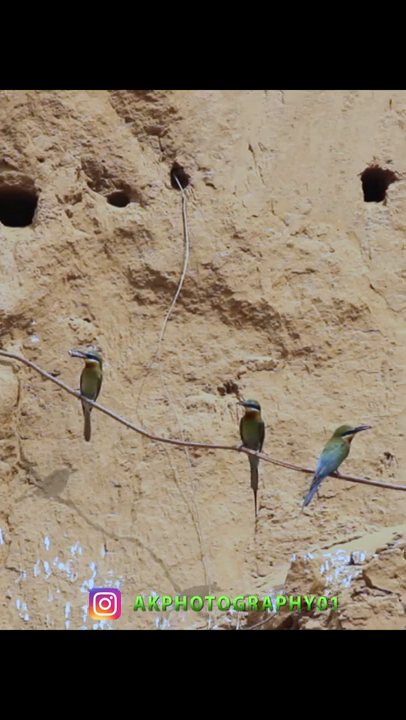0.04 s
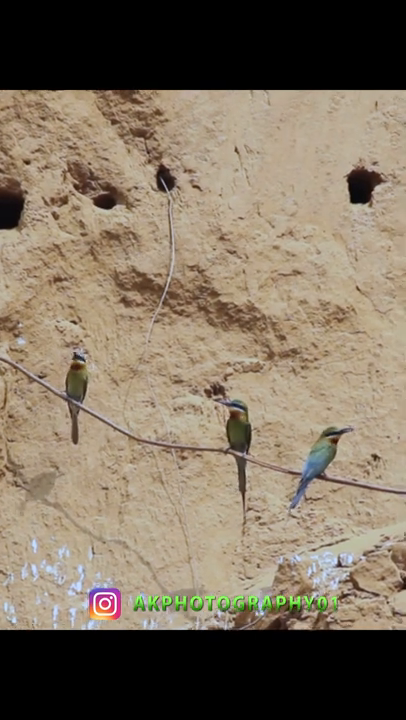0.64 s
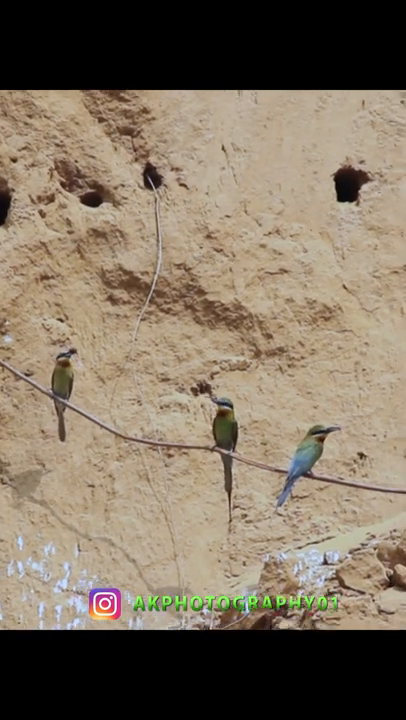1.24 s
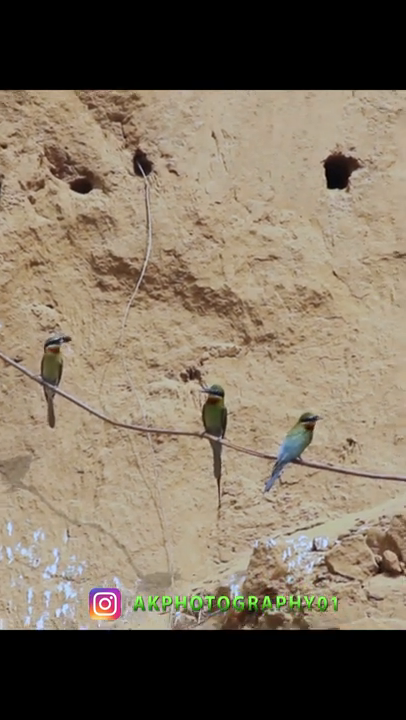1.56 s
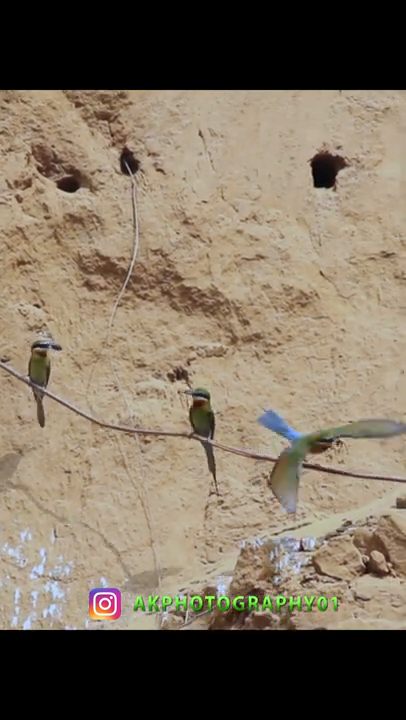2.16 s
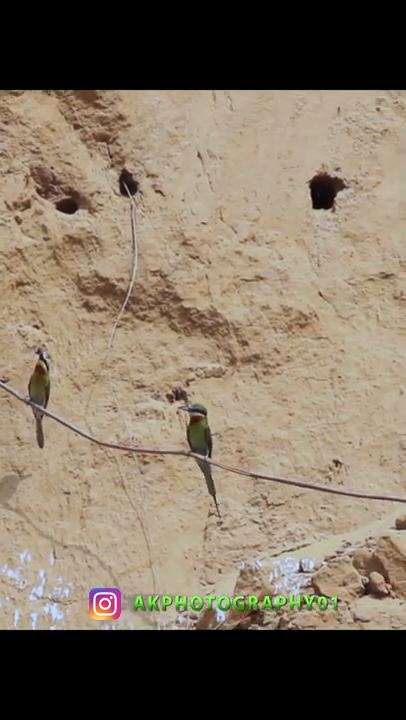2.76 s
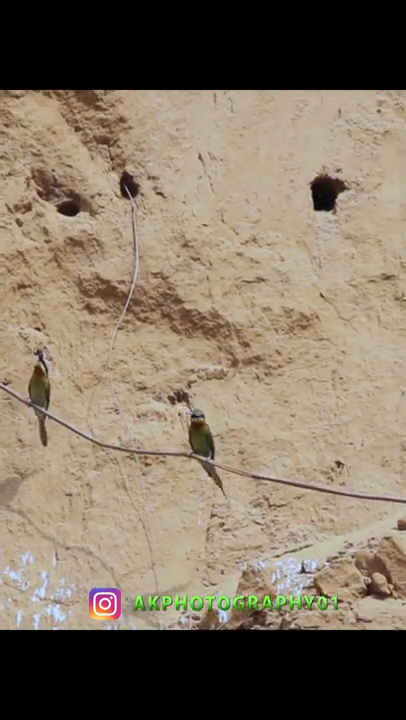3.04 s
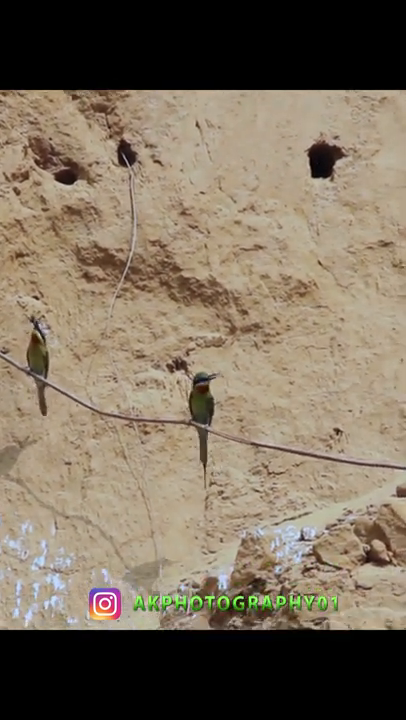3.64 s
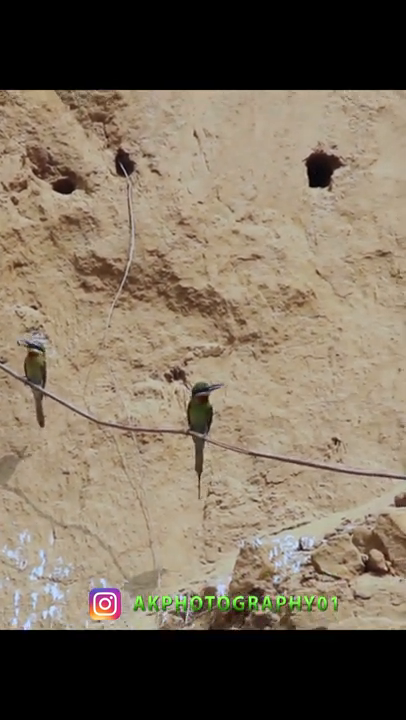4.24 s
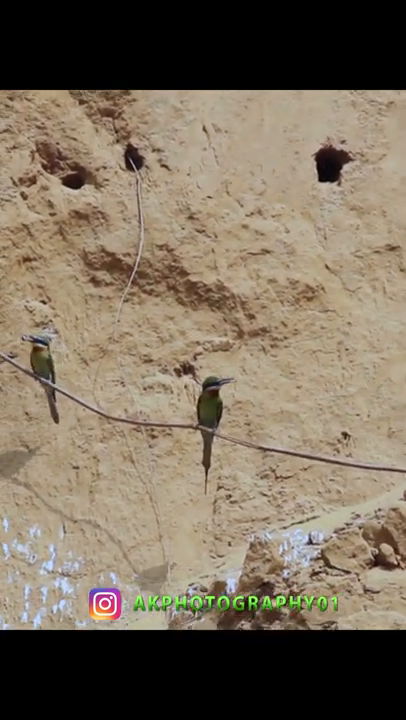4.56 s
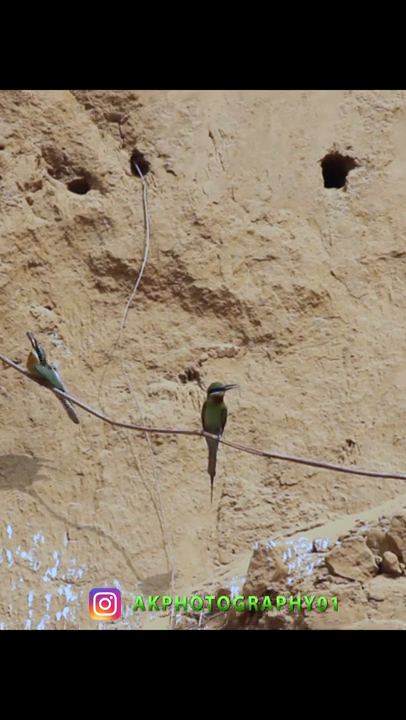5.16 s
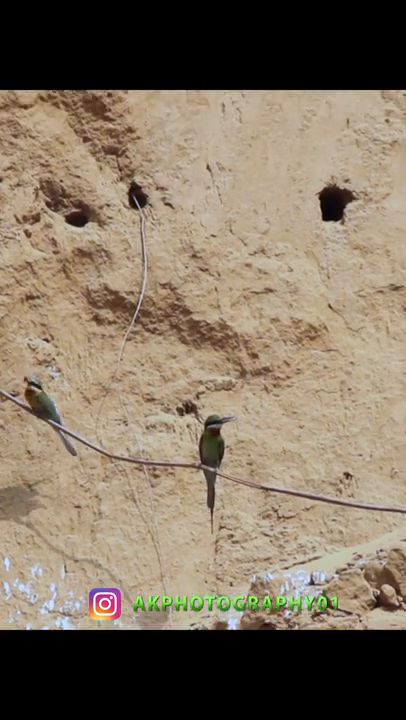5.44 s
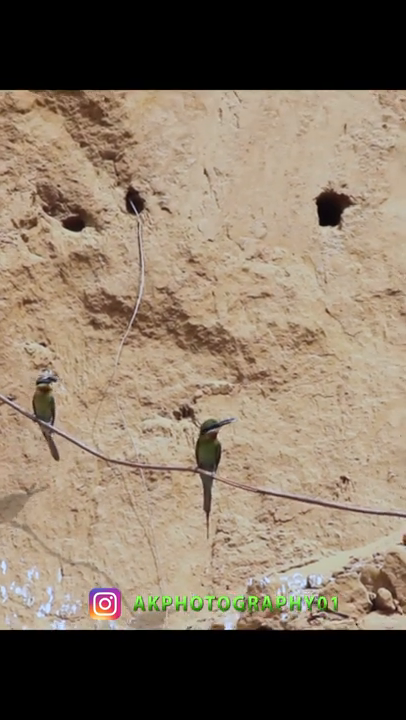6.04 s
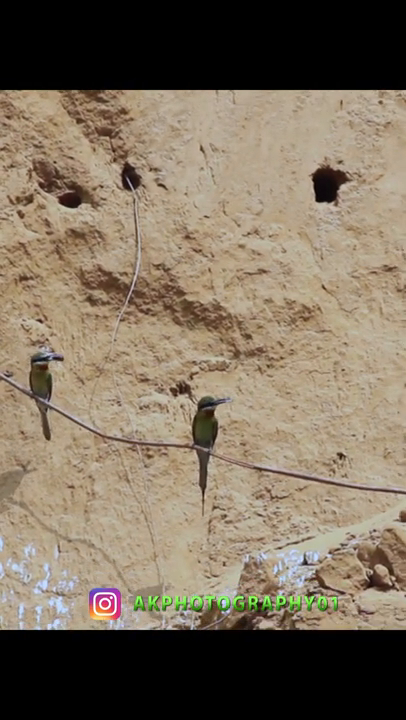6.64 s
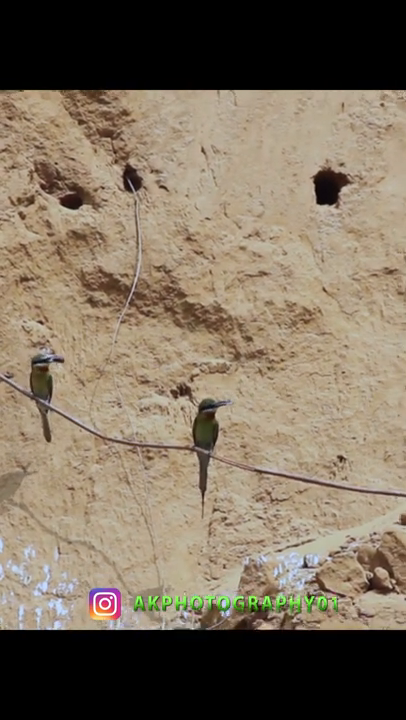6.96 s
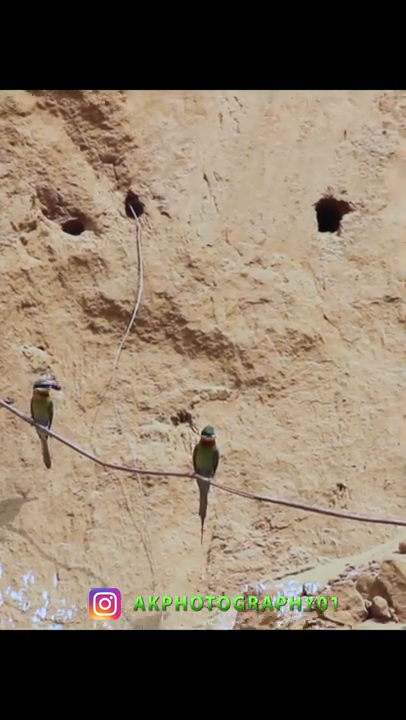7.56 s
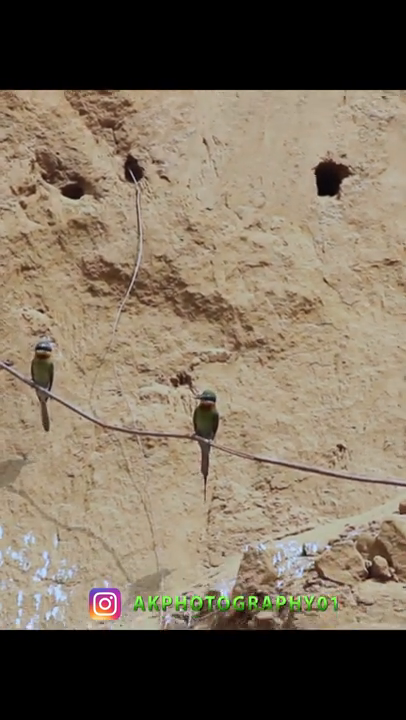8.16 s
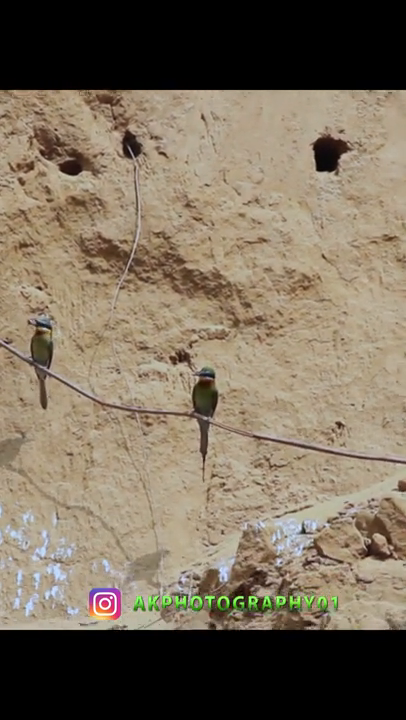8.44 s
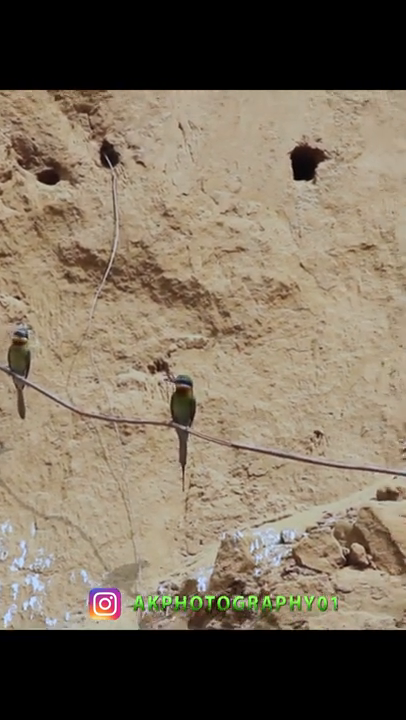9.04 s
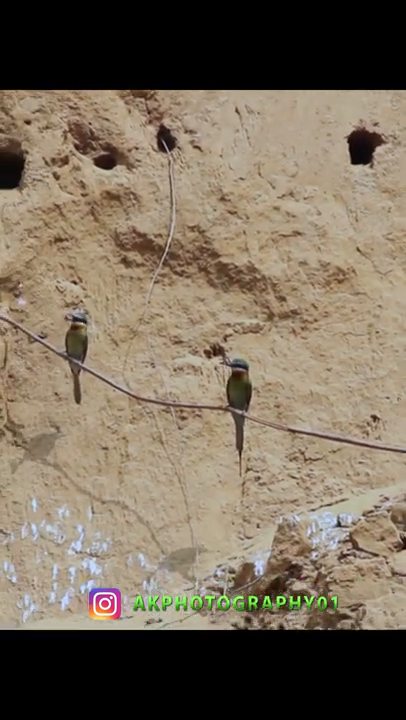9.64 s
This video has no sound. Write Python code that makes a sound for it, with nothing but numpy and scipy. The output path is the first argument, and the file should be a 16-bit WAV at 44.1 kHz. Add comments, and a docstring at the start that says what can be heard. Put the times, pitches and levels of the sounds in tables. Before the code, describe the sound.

Birds chirp in quick runs of cracking whistles, echoing lightly off a sandy bank over a steady high insect buzz and faint outdoor air. Close to the microphone, a camera shutter clicks twice, then twice again, among soft knocks and dry ticks. One bird takes off with a brief low ruffle between the pairs. Thin whistles come from farther away, and the chirps grow more frequent toward the end.

```python
"""Bee-eaters at a sandy nesting bank

Bee-eaters chirp in quick runs of cracking whistles, and the bank throws the calls back.
Insects buzz steadily over faint outdoor air and a low hum; thin whistles come from farther off.
Up close, a still camera rattles through two pairs of frames among soft knocks and dry ticks.
One bird ruffles the air as it takes off, and a few soft calls quaver."""
import sys
import numpy as np
from scipy import signal
from scipy.fft import rfft, irfft
from scipy.io import wavfile
from scipy.ndimage import uniform_filter1d

SR = 44100
rng = np.random.default_rng(int(sys.argv[2]) if len(sys.argv) > 2 else 0)


def wrap_up_sound(samples):
    """Save the sound to the file named by the first command line argument, as 16-bit audio."""
    columns = np.atleast_2d(samples).T
    # keep every value between -1 and 1, then stretch to whole-number steps
    tamed = np.clip(columns, -1, 1)
    steps = np.round(tamed * 32767).astype(np.int16)
    wavfile.write(sys.argv[1], SR, steps)


N = 436149
TIME = np.arange(N) / SR

# Colour of the outdoor air. Each row: frequency in Hz, gain in dB.
AIR_EQ = [(15, -45), (25, -11), (114, 0), (145, -6.5), (185, -1), (451, -5), (677, -4.5), (818, -6.5),
          (2220, -12), (2550, -11.5), (3160, -17.5), (4870, -18), (5570, -6.5), (7310, -19.5),
          (16000, -28.5)]
# Fader ride on the hum. Each row: time in seconds, relative level in dB.
HUM_RIDE = [(.2, -69), (.6, -56), (1, -65), (3.1, -71), (3.45, -50), (3.75, -66), (4.1, -56), (4.5, -55),
            (4.8, -69), (7.2, -61), (8.1, -69), (8.3, -53.5), (8.55, -65)]
# The insect chorus. Each row: centre in Hz, width in Hz, level in dB.
INSECT_BANDS = [(5523, 490, -57), (5880, 220, -73), (6440, 460, -63.5)]
# Throat resonance, shaping the fundamental. Each row: frequency in Hz, gain in dB.
THROAT_EQ = [(1800, -5), (2300, -10), (2780, 0), (3100, 0), (3350, -22), (3700, -29)]
# Upper resonances of throat and bill, colouring the overtones. Each row: frequency in Hz, gain in dB.
BILL_EQ = [(4000, 9), (5200, 14.5), (6500, 6), (7700, -4), (9000, -12), (10700, 4), (12200, -2),
           (13500, -26)]
# The notes of each named phrase. Each row: place in the call from 0 to 1, accent in dB, unscaled leap
# in Hz, then rise, half crest and fall in seconds, relative level of the rise in dB.
PHRASE_NOTES = { "rolling": [(0, 0, 1020, .044, .0028, .021, -3), (.57, -3.5, 900, .007, .001, .02, -5),
                (.9, 2, 130, .011, .0005, .009, -9), (1, .5, 60, .006, .0003, .026, -12)],
                "loose": [(0, -.5, 785, .031, .0008, .037, 1), (.44, -.5, 250, .006, .0002, .025, -18),
                (.85, 0, 700, .015, .0006, .02, -4), (1, -1, 430, .01, .0002, .028, -17)],
                "even": [(0, 0, 670, .031, .0005, .04, -2), (.51, -1, 820, .005, .0002, .025, -16),
                (1, 0, 550, .018, .0004, .028, .5)], "arched": [(0, -1, 45, .022, .0061, .008, -10),
                (.23, .5, 900, .018, .0046, .026, -18), (1, 0, 115, .022, .0098, .013, -4)],
                "chip": [(0, 0, 50, .01, .0058, .006, -5)]}
# Bee-eater calls. Each row: first and last crest in seconds, phrase, first and last level in dB,
# first and last shoulder pitch in Hz, leap scale, overtone trim in dB, echo send in dB.
CALL_CUES = [(.5075, .582, "arched", -25.7, -29.3, 2660, 2490, 1.1, -27, -18),
             (1.7345, 1.803, "arched", -24, -30.5, 2720, 2290, 1.25, -25, -15),
             (2.017, 2.0875, "even", -22.8, -23.8, 2550, 2670, .8, -29.5, -20),
             (3.0455, 3.138, "loose", -34.8, -33, 2400, 2610, 1.1, -37, -17),
             (3.8231, 3.891, "rolling", -24.8, -25.5, 2320, 2300, .9, -37.5, -8.5),
             (4.0636, 4.0636, "chip", -26.3, -26.3, 2430, 2430, 1, -23, -8.5),
             (4.466, 4.543, "even", -23.5, -25.3, 2520, 2500, .9, -28, -9.5),
             (5.038, 5.1385, "loose", -37.5, -40, 2450, 2430, 1.05, -41, -10),
             (5.388, 5.4848, "loose", -41.5, -43.5, 2435, 2400, 1.05, -40, -9),
             (7.067, 7.143, "rolling", -25, -25.5, 2460, 2500, .95, -35.5, -10),
             (7.1975, 7.2738, "even", -21.5, -25, 2670, 2410, .55, -31, -15),
             (7.3845, 7.4608, "rolling", -23.3, -21.3, 2480, 2380, .85, -39.5, -12),
             (7.683, 7.7613, "rolling", -19, -19, 2515, 2365, .85, -39, -14),
             (8.1675, 8.2462, "rolling", -19.2, -22.7, 2515, 2500, .9, -42, -10),
             (8.5483, 8.628, "rolling", -18.3, -25, 2460, 2515, .95, -43, -9.5),
             (9.1363, 9.2188, "even", -26.3, -29.3, 2550, 2485, 1.25, -21.5, -6.5),
             (9.411, 9.4894, "even", -25.5, -26, 2580, 2615, .85, -24.5, -7.5),
             (9.77, 9.834, "even", -30.3, -36.5, 2550, 2390, 1.15, -27.5, -1.5)]
# Ring of the sand bank. Each row: frequency in Hz, seconds to fade by 60 dB.
BANK_DECAY = [(300, .25), (2700, 0.46), (8000, 0.37), (15000, 0.26)]
# Soft knocks. Each row: start in seconds, level in dB, pitch in Hz, decay in seconds.
KNOCK_CUES = [(.7175, -21, 1120, 0.00079), (1.98, -20, 850, 0.00082), (1.9915, -28.5, 715, .0012),
              (2.383, -21.5, 1520, 0.0016), (2.384, -32.5, 240, 0.006), (3.11, -30, 700, 0.0013),
              (4.065, -37.5, 1655, 0.015), (8.5826, -21.5, 463, .0025), (8.613, -20, 960, .0015),
              (8.631, -19.5, 970, 0.0011), (8.674, -30, 800, 0.001)]
# The camera's shutter releases, in seconds.
RELEASE_TIMES = [.774, 0.9126, 2.524, 2.6631]
# The hits of one shutter cycle. Each row: offset from the release in seconds, level in dB,
# hold in seconds, decay in seconds, low shelf in dB.
SHUTTER_HITS = [(-.047, -40, 0.0017, 0.0031, -5), (-.039, -31, 0.00038, 0.0084, -6.5),
                (-.023, -32.5, 0.0025, 0.0063, 1.5), (-.0005, -25.5, 0.0024, 0.0028, -2.5),
                (.008, -40.5, .02, .006, 5.5), (.033, -29, 0.0043, 0.0036, -16.5)]
# Resonances of the camera body. Each row: frequency in Hz, gain in dB.
CAMERA_EQ = [(120, -44), (200, -14.5), (416, -3), (509, -36), (590, 2), (1040, -12), (2090, 1), (2860, -12),
             (5420, -5), (7010, -16.5), (8740, -16), (10100, -8), (12600, -19), (13800, -21), (16000, -32)]
# Dry ticks. Each row: start in seconds, relative level in dB.
TICK_CUES = [(1.0783, -39.5), (1.168, -37), (1.3064, -38.5), (2.1859, -43), (3.9776, -38), (4.055, -48),
             (4.1155, -38), (5.926, -39.5), (7.436, -37), (7.754, -42), (8.5828, -23), (8.613, -38),
             (8.6707, -39)]
# Thin arched whistles. Each row: start and length in seconds, top pitch in Hz, relative level in dB.
ARCH_CUES = [(1.855, 0.069, 7670, -48), (4.772, .07, 7800, -53.5), (5.224, 0.082, 8250, -47.5),
             (6.34, .07, 7900, -59), (8.03, 0.067, 8320, -45.5)]
# Pitch of that arch at even steps of time, as shares of its top.
ARCH_CONTOUR = [.8, .97, 1, .95, .85, .68, .48]
# Fader ride on the take-off. Each row: time in seconds, level in dB.
WING_RIDE = [(2.14, -63), (2.19, -35.5), (2.25, -62)]
# Colour of the wing noise. Each row: frequency in Hz, gain in dB.
WING_EQ = [(35, -43), (60, -17), (123, -2), (270, -6), (401, -1), (759, -5), (1480, -16), (3000, -51),
           (3900, -60), (6600, -120)]
# Soft quavering calls. Each row: start and length in seconds, pitch in Hz, level in dB, depth in Hz.
TRILL_CUES = [(2.73, 0.016, 2520, -41.5, 20), (2.757, 0.13, 2607, -43, 230),
              (6.192, 0.027, 2530, -48.5, 150)]
# Far, nearly level tones. Each row: start and length in seconds, first pitch in Hz, relative level in dB.
FAR_TONE_CUES = [(3.36, .08, 2130, -56), (6.13, .14, 740, -64), (6.42, .16, 730, -65),
                 (8.02, .14, 720, -63)]
# Far rising whistles. Each row: start and length in seconds, end pitch in Hz, relative level in dB.
PEEP_CUES = [(3.66, 0.042, 4000, -59), (6.3, .11, 4070, -61), (7.305, .04, 3620, -61),
             (7.815, .05, 3720, -61), (8.68, .04, 3720, -58), (9.66, .04, 3600, -60)]


def amp(db):
    """Decibels to gain."""
    return 10 ** (np.asarray(db) / 20)


def unit(x):
    """Scales to rms 1."""
    return x / np.sqrt(np.mean(x ** 2) + 1e-20)


def curve_at(points, hz):
    """Reads a curve on a log-frequency axis."""
    f, value = np.transpose(points)
    return np.interp(np.log(hz + 1), np.log(f + 1), value)


def add(mix, start, sound):
    """Drops a sound into the mix at a start in seconds."""
    part = mix[max(round(start * SR), 0):][:len(sound)]
    part += sound[:len(part)]


def noise(colour_db, size):
    """Noise of rms 1, shaped by the EQ colour_db(Hz)."""
    hz = np.fft.rfftfreq(size, 1 / SR)
    return unit(irfft(rfft(rng.standard_normal(size)) * amp(colour_db(hz)), size))


def wander(rate_hz, size=8192):
    """Smooth random modulation of rms 1, rolled off above the rate."""
    return noise(lambda hz: -10 * np.log10(1 + (hz / rate_hz) ** 6), size)


def phase_of(hz):
    """Running phase of a pitch curve."""
    return 2 * np.pi * np.cumsum(hz) / SR


def air(level_db=-52, swell_db=1.0, patch_db=1.5):
    """A soft bed of outdoor noise, with drifting patches below 5 kHz."""
    wash = amp(level_db + swell_db * wander(9.1, N)) * noise(lambda hz: curve_at(AIR_EQ, hz), N)
    hz, _, spectra = signal.stft(wash, SR, nperseg=2048)
    patches = uniform_filter1d(rng.standard_normal(spectra.shape), size=5, axis=0)
    patches = unit(uniform_filter1d(patches, size=7, axis=1)) * (hz < 5000)[:, None]
    return signal.istft(spectra * amp(patch_db * patches), SR, nperseg=2048)[1][:N]


def hum(pitch_hz=118, waver_hz=1.4):
    """A far, low tone that wavers and swells."""
    tone = unit(np.sin(phase_of(pitch_hz + waver_hz * wander(3.3, N))))
    return amp(np.interp(TIME, *np.transpose(HUM_RIDE)) - 2.5) * tone


def insects(throb_db=1.3):
    """Many tymbals blur into narrow bands that throb unevenly."""
    out = np.zeros(N)
    for centre_hz, width_hz, db in INSECT_BANDS:
        band = noise(lambda hz: -10 * np.log10(1 + (2 * (hz - centre_hz) / width_hz) ** 4), N)
        out += amp(db + throb_db * wander(49, N)) * band
    return out


def chirp_note(db, shoulder_hz, leap_hz, shape, overtone_db, jitter=.015, burr_hz=260, sub_db=-14.5):
    """A level whistle leaps to a crest, where the voice can crack, then slides down."""
    rise, crest, fall, rise_db = shape
    t = np.arange(-rise, crest + fall, 1 / SR)  # zero is mid-crest
    knee = min(crest + .005, .6 * rise)
    from_crest = np.maximum(abs(t) - crest, 0)
    glide = np.interp(t, [-rise, -.75 * rise, -knee, crest, crest + fall], [.86, .98, 1.02, 1.14, .82])
    hz = shoulder_hz * glide + leap_hz * np.exp(-from_crest / .0018)
    # a quick pitch flutter around the crest
    burr = .039 * np.exp(-from_crest / .007) * np.sin(2 * np.pi * (burr_hz * t + rng.random()))
    # nearly pure at the opening, rough from the leap onwards
    rough = np.interp(t, [-2 * knee, -knee], [.25, 1])
    hz *= 1 + burr + rough * jitter * wander(620)[:len(t)]
    shiver = amp(1.5 * rough * wander(180)[:len(t)])
    effort = np.interp(t, [-rise, -.9 * rise, -knee, -.35 * knee, crest + .3 * fall, crest + fall],
                       [0, amp(rise_db), amp(rise_db), 1, 1, 0])
    phase = phase_of(hz)
    # the throat rings only while the pitch sweeps through it
    voice = amp(curve_at(THROAT_EQ, hz)) * np.sin(phase)
    overtones = sum(amp(curve_at(BILL_EQ, k * hz)) * np.sin(k * phase) for k in range(2, 6))
    # at the top the voice cracks: overtones give way to a sub-octave
    cracked = np.clip((hz - 3150) / 350, 0, 1)
    voice += amp(overtone_db - 2.5) * (1 - cracked) * overtones
    voice += amp(sub_db) * cracked * np.sin(phase / 2)
    return amp(db) * effort * shiver * voice


def bee_eaters():
    """Each call runs through its phrase, drifting in level and pitch; a share is sent to the bank."""
    direct, send = np.zeros((2, N))
    for call in CALL_CUES:
        first_s, last_s, phrase, first_db, last_db, first_hz, last_hz = call[:7]
        leap_scale, overtone_db, send_db = call[7:]
        first, last = np.array([(first_s, first_db, first_hz), (last_s, last_db, last_hz)])
        for place, accent_db, leap_hz, *shape in PHRASE_NOTES[phrase]:
            crest_s, db, hz = first + place * (last - first)
            note = chirp_note(db + accent_db, hz, leap_scale * leap_hz, shape, overtone_db)
            start = crest_s - shape[0]  # the rise leads into the cue
            add(direct, start, note)
            add(send, start, amp(send_db) * note)
    return direct, send


def ground_bounce(x, ground_s=.0034, ground_db=-15, ledge_s=.0085, ledge_db=-16):
    """Weak bounces off the ground and a near ledge ripple the sweeping notes."""
    ground = amp(ground_db) * np.interp(TIME - ground_s, TIME, x)
    ledge = amp(ledge_db) * np.interp(TIME - ledge_s, TIME, x)
    return x + ground + ledge


def bank_echo(x, predelay_s=.007, taps_per_s=2000, early_db=5, early_decay_s=.036):
    """Scattered echoes off the sand face, strong at first, then a faint tail."""
    t = np.arange(SR) / SR
    taps = rng.choice([-1., 1.], SR) * (rng.random(SR) < taps_per_s / SR) * (t > predelay_s)
    taps *= 1 + amp(early_db) * np.exp(-t / early_decay_s)
    hz, age, spectra = signal.stft(taps, SR, nperseg=256)
    fade = amp(-60 * age / curve_at(BANK_DECAY, hz)[:, None])
    tail = signal.istft(spectra * fade, SR, nperseg=256)[1]
    return signal.fftconvolve(x, tail / np.linalg.norm(tail))[:N]


def knocks(grit=.24, attack_s=.00053):
    """Heavily damped knocks: a blip of tone with a scuff of noise."""
    out, t = np.zeros(N), np.arange(4096) / SR
    for start, db, pitch_hz, decay in KNOCK_CUES:
        scuff = noise(lambda hz: -10 * np.log10(
            1 + (hz / (1.5 * pitch_hz)) ** 4 + (.3 * pitch_hz / (hz + 1)) ** 2), len(t))
        envelope = np.minimum(t / attack_s, 1) * np.exp(-t / decay)
        add(out, start, amp(db) * envelope * (np.sin(2 * np.pi * pitch_hz * t) + grit * scuff))
    return out


def camera(shelf_hz=2200, attack_s=.00079):
    """Latch, mirror, shutter blades, motor and mirror return: short rattles in one body."""
    out, t = np.zeros(N), np.arange(4096) / SR
    for release in RELEASE_TIMES:
        for offset, db, hold, decay, shelf_db in SHUTTER_HITS:
            rattle = noise(lambda hz: curve_at(CAMERA_EQ, hz) + shelf_db / (1 + (hz / shelf_hz) ** 2),
                           len(t))
            envelope = np.minimum(t / attack_s, 1) * np.exp(-np.maximum(t - hold, 0) / decay)
            add(out, release + offset, amp(db) * envelope * rattle)
    return out


def ticks(decay_s=.0073):
    """Small, dry snaps of bright noise."""
    out, t = np.zeros(N), np.arange(4096) / SR
    for start, db in TICK_CUES:
        snap = noise(lambda hz: curve_at([(500, 7), (8000, .5), (11000, 3.5), (16000, -5.5)], hz), len(t))
        add(out, start, amp(db - 6) * snap * np.exp(-t / decay_s))
    return out


def far_whistles(cues, contour, jitter):
    """Far birds: swelling pure tones that share one pitch contour."""
    out = np.zeros(N)
    for start, length, hz, db in cues:
        progress = np.linspace(0, 1, int(length * SR))
        pitch = hz * np.interp(progress, np.linspace(0, 1, len(contour)), contour)
        pitch *= 1 + jitter * wander(440)[:len(pitch)]
        swell = (.5 + progress) * signal.windows.tukey(len(pitch), .2)
        add(out, start, amp(db - 1.5) * swell * np.sin(phase_of(pitch)))
    return out


def wings():
    """A low ruffle of air as a bird takes off."""
    level_db = np.interp(TIME, *np.transpose(WING_RIDE), left=-120, right=-120)
    return amp(level_db) * noise(lambda hz: curve_at(WING_EQ, hz), N)


def trills(quaver_hz=140):
    """Soft arched calls with a fast quaver in the pitch."""
    out = np.zeros(N)
    for start, length, hz, db, depth_hz in TRILL_CUES:
        progress = np.linspace(0, 1, int(length * SR))
        arch = hz * np.interp(progress, [0, .3, .8, 1], [.91, 1, 1.02, .75])
        quaver = depth_hz * np.sin(np.pi * progress) * np.sin(2 * np.pi * quaver_hz * length * progress)
        add(out, start, amp(db) * signal.windows.tukey(len(arch), .2) * np.sin(phase_of(arch + quaver)))
    return out


def scene():
    """The mono mix: close sounds nearly dry, far birds wet, over a steady bed."""
    calls, call_send = bee_eaters()
    far = far_whistles(ARCH_CUES, ARCH_CONTOUR, jitter=.0096)
    far += far_whistles(PEEP_CUES, [.86, .95, 1], jitter=.0048)
    far += far_whistles(FAR_TONE_CUES, [1, .95], jitter=.01)
    close = camera() + knocks() + ticks() + wings()
    soft_calls = trills()
    echo = bank_echo(call_send + amp(-1) * far + amp(-17) * close + amp(-11.5) * soft_calls)
    bed = insects() + air() + hum()
    return (ground_bounce(calls + soft_calls + far) + close + echo + bed)[None]


def record(dry, silence_s=.069, fade_s=.002, cutoff_hz=15950):
    """The sound opens after a moment of silence, through a steep high cut."""
    opened = dry * np.clip((TIME - silence_s) / fade_s, 0, 1)
    high_cut = signal.firwin(511, cutoff_hz, window=("kaiser", 9), fs=SR)
    return signal.oaconvolve(opened, high_cut[None], "same")


dry = scene()
out = record(dry)
wrap_up_sound(out)
```